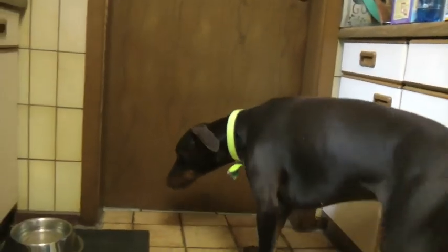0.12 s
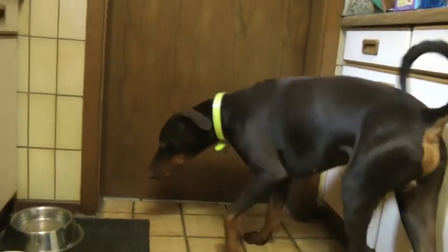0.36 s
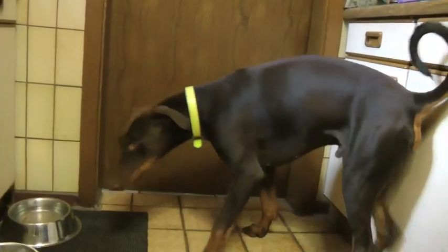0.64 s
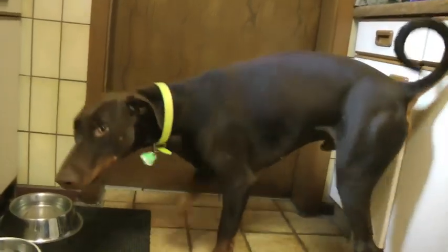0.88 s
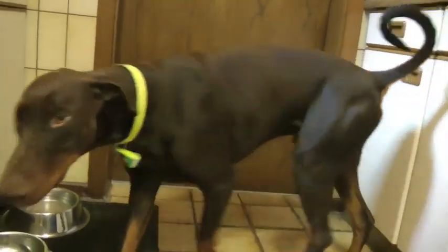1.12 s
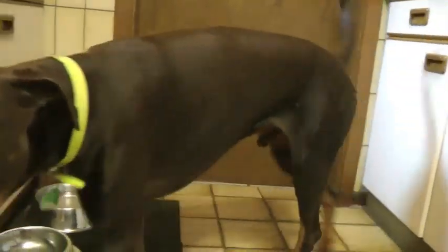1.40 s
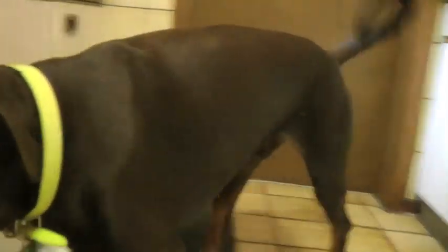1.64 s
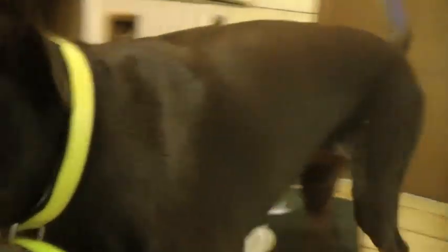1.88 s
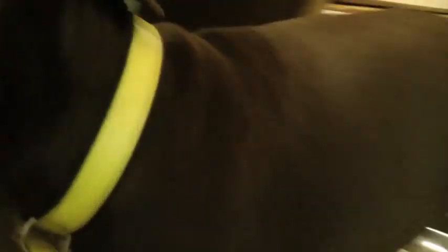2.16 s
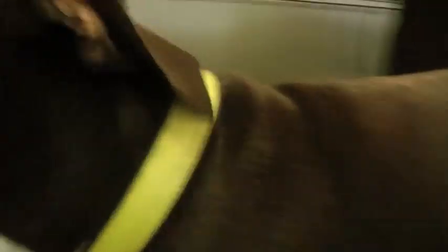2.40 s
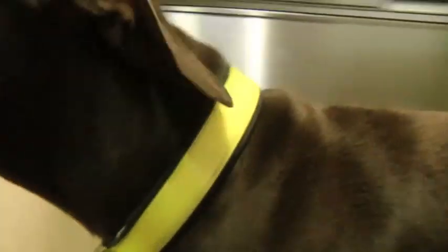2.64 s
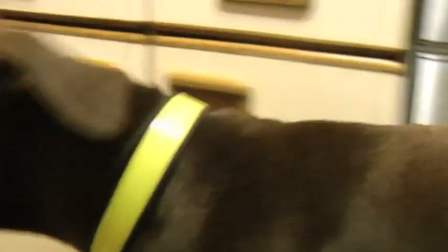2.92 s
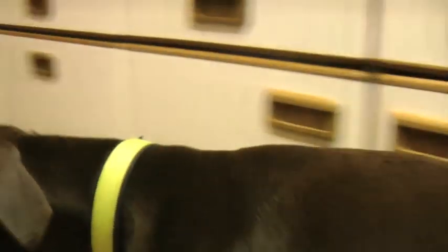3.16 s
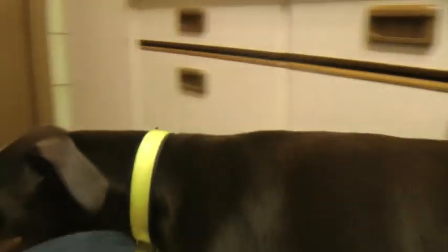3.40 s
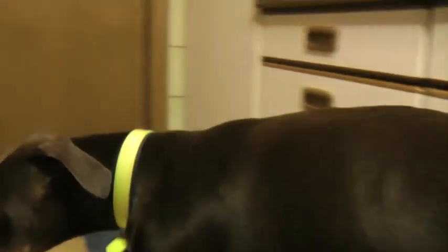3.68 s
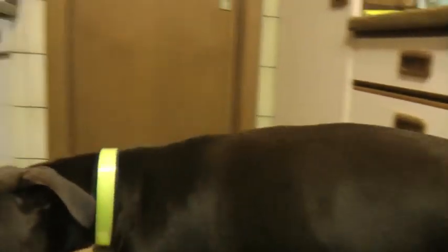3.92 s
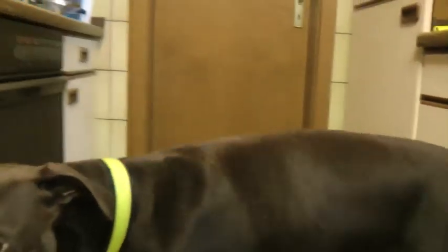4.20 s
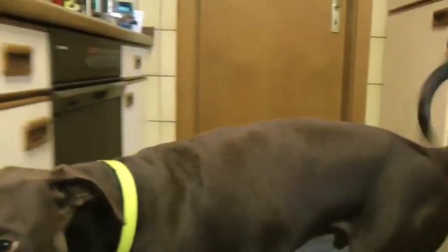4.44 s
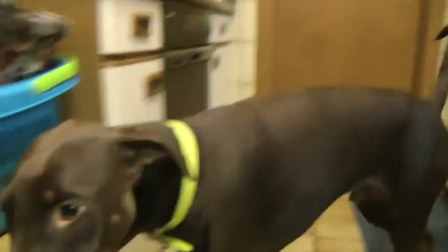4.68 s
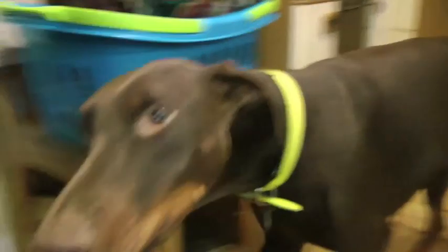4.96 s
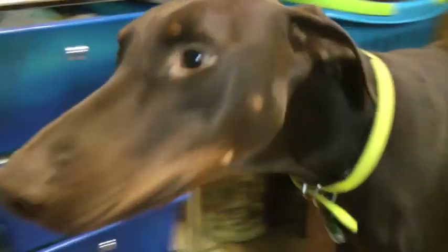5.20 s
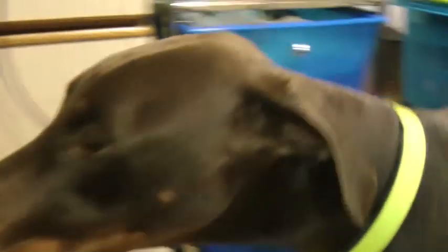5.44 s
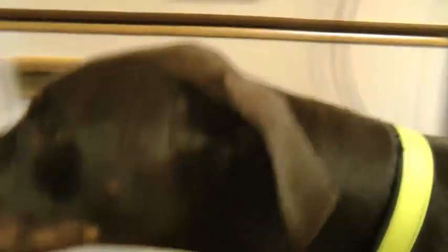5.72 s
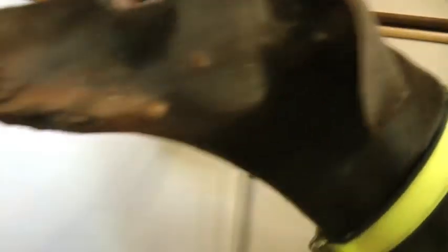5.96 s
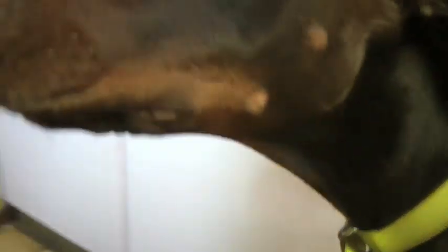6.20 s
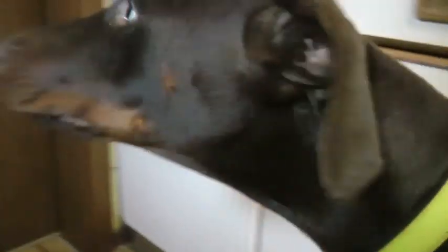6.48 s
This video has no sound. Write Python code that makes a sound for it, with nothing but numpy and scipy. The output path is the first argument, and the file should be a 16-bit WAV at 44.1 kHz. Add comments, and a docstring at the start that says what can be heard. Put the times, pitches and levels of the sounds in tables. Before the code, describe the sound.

A large dog paces close to a hand-held microphone in a small tiled kitchen. Four short, falling whimpers come first, mixed with piercing nose whistles and breaths. A lull of rustling, paw thuds and claw ticks follows, then fainter whines and a long whistle. Collar tags jingle brightly before a last cluster of low, broken whimpers. Short room echo and light handling rumble.

```python
"""In a small tiled kitchen, a large dog whimpers while pacing close to a hand-held camera.
Each whimper is a stack of overtones on a gliding pitch; high nose whistles are fluttering, fuzzy tones.
Breaths are noise through nostril resonances. Collar tags ring in dying noise bands, claws tick on tile,
and paws land with soft thuds. A wide rustle, low rumble and short room echo lie behind the dog."""
import sys
import numpy as np
from scipy import signal
from scipy.io import wavfile
from scipy.ndimage import uniform_filter1d

SR = 44100
rng = np.random.default_rng(int(sys.argv[2]) if len(sys.argv) > 2 else 0)


def waveform_to_disk(signal):
    """Save audio, clipped to [-1, 1], as 16-bit WAV at the path in sys.argv[1]."""
    frames = np.transpose(np.atleast_2d(signal))
    scaled = np.clip(frames, -1, 1) * 32767
    samples = np.round(scaled).astype(np.int16)
    wavfile.write(sys.argv[1], SR, samples)


def gain_from_decibels(decibels):
    """Convert decibel values to linear amplitude factors."""
    exponent = np.asarray(decibels, float) / 20
    return 10 ** exponent


N = 290619  # length in samples

# Rustle of coat, paws and panting, level before an overall trim: time_s, level_db
RUSTLE_LEVELS = [(0.0, -34.5), (.3, -35), (.59, -42.5), (.95, -39.5), (1.15, -42.5), (1.3, -40),
                 (1.7, -43.5), (1.91, -34), (2.21, -40), (2.449, -25.5), (2.66, -38.5), (2.88, -33),
                 (3.0, -36), (3.45, -35), (4.02, -38), (4.53, -33), (4.9, -35), (5.07, -28), (5.3, -32),
                 (5.61, -44), (5.9, -35), (6.28, -33.5), (6.59, -38.5)]
# Colour of the rustle, before its brightness drifts: frequency_hz, relative_level_db
RUSTLE_COLOUR = [(41, -27), (70, -3), (255, 0), (392, -0.5), (774, 1), (971, 1), (1300, 4), (1790, 1),
                 (6530, -7.5), (8570, -12), (14400, -21.5), (15800, -21)]
# How alike left and right are in the rustle: frequency_hz, likeness (1 = the same)
LEFT_RIGHT_LIKENESS = [(60, 0.12), (130, 1), (290, 0.54), (640, 0.82), (1410, 0.71), (3100, 0.9),
                       (6820, 0.94), (15000, 1)]
# Shifts of the hand on the camera, heard as low rumble: time_s, level_db
HAND_SHIFTS = [(.08, -61), (.4, -53), (.9, -58), (1.271, -46), (1.67, -44.5), (2.44, -59), (4.09, -53),
               (4.61, -49), (5.27, -54), (6.18, -68)]
SHIFT_RISE_DB_PER_S, SHIFT_FALL_DB_PER_S, STILL_HAND_DB = 161.5, 88, -102
# How long the kitchen echo takes to fall by 60 dB: frequency_hz, decay_s
ECHO_DECAY = [(300, 0.28), (1000, 0.34), (3000, 0.53), (8000, 0.062)]
# Paws landing: time_s, level_db, pitch_hz
PAW_STEPS = [(1.414, -38.5, 223.6), (2.421, -24, 235), (2.915, -25, 246), (3.144, -27, 149),
             (3.499, -25.5, 330), (4.088, -37.5, 86), (4.348, -26.5, 156), (4.76, -33.5, 320),
             (5.913, -29.5, 350)]
# Claws on tile: time_s, peak_db, centre_hz, left_over_right_db
CLAW_TICKS = [(0.215, -19, 3600, 1), (2.058, -16, 2660, 0), (2.2432, -23.5, 2460, 0),
              (2.28, -27, 3120, 0.0), (2.348, -19, 5200, 2.5), (2.8489, -24.5, 5950, 0),
              (3.0967, -27, 6400, 2), (3.4616, -21, 1610, -3), (3.5892, -12, 4470, 0.5),
              (4.2504, -18.5, 2940, -2), (5.79, -23, 2090, 1), (4.4651, -12.5, 4870, -2)]
# Collar tags knocking: time_s, level_db, low_ring_db, top_ring_db
TAG_KNOCKS = [(0.3965, -28, -0.5, -4), (0.7427, -21, -22, -18), (1.5409, -29.5, -26, -18),
              (1.6477, -27.5, -24, -14), (2.7711, -21.5, -5, -11), (2.8744, -35, -4, -4),
              (2.9292, -35, -19, -5), (3.8631, -23, -31, -21), (4.0228, -25, -34, -12),
              (4.1194, -28, -32, -13), (4.2154, -32.5, -52, -12), (4.375, -25.5, -10, -11),
              (4.4538, -26, -9, -7), (4.6399, -22, -35, -32), (5.2096, -29, -28, -4),
              (5.4625, -12.5, -4.5, -2), (5.5523, -18, -14, -13), (5.619, -22.5, -17, -14),
              (5.6481, -26, -11, -8), (5.8007, -23, -7.5, -4), (5.9853, -19, -9, -11),
              (6.2173, -22, -6, -7), (6.328, -22.5, -11, -4), (6.5071, -25, -21, -12)]
# Ringing tones of the tags: frequency_hz, relative_level_db, fall_by_60_db_s, resonance_width_hz
TAG_MODES = [(5800, 3, 0.047, 1300), (6570, 5.5, 0.24, 144), (8160, -20.5, 0.63, 100),
             (9070, -3, 0.19, 1000), (9425, -3.5, 0.06, 290), (9580, -3.5, 0.49, 250),
             (9800, -42, 0.061, 92), (13100, -28, 0.058, 910), (13900, 2, 0.17, 380),
             (14600, -14, 0.23, 1600), (15240, 2.5, 0.23, 400)]
# Breaths through the nostrils: start_s, length_s, level_db, nostril_hz, swell_db_per_s
BREATHS = [(.62, .18, -30, 4740, -64), (1.27, 0.3, -28.5, 4860, -25), (1.62, 0.46, -36, 4280, 13),
           (3.8, .46, -30, 4350, 11), (4.38, 0.48, -31, 4600, -6), (4.95, 0.53, -28.5, 4420, -24),
           (5.9, 0.75, -30, 4410, -10)]
# Breath envelope, one row: attack_s, rise_db, release_s, fall_db, arch_db
BREATH_SHAPE = (0.1, 14.5, 0.15, 25, 4.3)
NOSTRIL_DIP_HZ = 178  # the nostrils flare and their resonance sinks in mid breath
# Lower strands that join some whistles: start_s, length_s, level_db, pitch_hz, end_pitch_hz
LOWER_STRANDS = [(1.27, .1, -34, 4485, 4950), (1.37, 0.087, -45, 4440, 4730),
                 (1.64, 0.086, -42.5, 4570, 4060), (1.72, .08, -46, 4070, 4010),
                 (1.84, 0.159, -27.5, 4340, 4250), (3.84, 0.12, -34, 4470, 3920),
                 (3.93, 0.14, -36, 3900, 3930), (4.02, .18, -34.5, 3933, 4420),
                 (4.97, 0.13, -30, 4000, 4850), (6.06, .2, -36, 4330, 4250)]
# Strand envelope, one row: attack_s, rise_db, release_s, fall_db, arch_db
STRAND_ENVELOPE = (0.032, 11, 0.031, 14, 1.7)
# Nose whistles: start_s, length_s, level_db, pitch_hz, end_pitch_hz
NOSE_WHISTLES = [(0.0, 0.064, -17, 5180, 5305), (.38, 0.052, -19, 5441, 5514),
                 (.87, 0.087, -21.5, 5474, 5430), (1.36, 0.13, -27.5, 4880, 5130),
                 (1.61, 0.13, -28.5, 5260, 4820), (1.79, 0.12, -26, 4870, 4830),
                 (1.85, 0.18, -22, 4876, 4920), (3.5, 0.15, -34.5, 5150, 5000),
                 (3.78, 0.034, -37, 5320, 5400), (3.83, 0.11, -27, 4810, 4826),
                 (4.35, 0.046, -30.5, 5209, 5380), (4.43, .25, -21, 5000, 4753),
                 (4.65, 0.072, -20, 5110, 5076), (4.905, .075, -27.5, 5330, 5300),
                 (5.06, 0.33, -16, 5242, 5107), (5.84, 0.077, -32, 5240, 5440),
                 (5.98, 0.15, -27, 5190, 5296), (6.09, 0.11, -21, 5360, 5300),
                 (6.24, 0.054, -17, 5130, 5200), (6.32, 0.039, -23, 5000, 4980),
                 (6.45, 0.096, -30, 4978, 5070)]
# Whistle envelope, one row: attack_s, rise_db, release_s, fall_db, arch_db
WHISTLE_ENVELOPE = (0.0083, 8.6, 0.045, 14, 10.4)
SCOOP_HZ, SCOOP_S = 214.3, 0.01184  # depth and time constant of a whistle's slide up into its pitch
# Whimpers, one list of points each: time_s, pitch_hz, level_db
WHIMPER_PATHS = [
    [(0, 992, -15.5), (.06, 956, -25.5), (.14, 924, -22), (.165, 841.5, -10), (.18, 585, -32),
     (.2, 510, -36)],
    [(.404, 894, -18.5), (.425, 941, -9.5), (.47, 1021, -19), (.5, 993, -15.5), (.525, 943.4, -15.5),
     (.62, 929, -16.5), (.65, 875, -13), (.668, 542, -28.5), (.69, 483, -19.5)],
    [(.903, 840, -14), (.95, 908.3, -13), (1.02, 874, -17), (1.05, 783.8, -13.5), (1.2, 755.3, -16.5),
     (1.24, 704, -15), (1.3, 646.4, -18.5), (1.335, 567.4, -16), (1.44, 518.8, -34)],
    [(1.654, 789, -25), (1.67, 834, -9.5), (1.71, 829, -11), (1.74, 749, -17), (1.825, 669, -15),
     (1.86, 572.3, -22), (1.92, 556, -25.5), (1.96, 593, -43)],
    [(3.86, 690, -42), (3.895, 708, -28), (3.912, 722, -15), (3.95, 714.5, -17), (3.99, 736, -23.5),
     (4.05, 740, -17), (4.09, 709.4, -23), (4.135, 696, -23.5), (4.165, 602, -36.5)],
    [(4.55, 815, -39), (4.585, 789, -25), (4.68, 739, -34), (4.71, 526, -51)],
    [(6.01, 385, -50), (6.04, 394, -44), (6.11, 453, -51), (6.14, 414, -52)],
    [(6.158, 475, -12.5), (6.172, 542, -17), (6.19, 490, -12), (6.215, 538, -14), (6.243, 504, -18.5),
     (6.262, 418, -21)],
    [(6.27, 508, -19), (6.3, 572, -15), (6.32, 531, -16), (6.334, 456, -19)],
    [(6.336, 520, -13), (6.35, 568, -15), (6.385, 604, -14), (6.425, 600, -16), (6.445, 535, -24.5),
     (6.465, 397, -30.5)],
]
# Brightness, one row a whimper: throat_overtones_db, nose_overtones_db
WHIMPER_BRIGHTNESS = [(-1, 9), (1.5, -2), (0.5, -13), (-4.5, -16), (-3, -22), (-7.5, -2), (-15, -15),
                      (-18.5, -12), (-13, -2), (-12.5, -22)]
# Gain of the overtones through throat and closed muzzle: frequency_hz, gain_db
MUZZLE_GAIN = [(900, -1), (1400, -12.5), (1900, -9), (2400, -21), (3000, -28.5), (3900, -12.5),
               (4700, -18.5), (5600, -14), (7000, -39), (9500, -30.5), (13000, -55)]
USUAL_DB, FOLLOW = -13, 0.73  # overtones follow only a share of the swings around the usual level
THROAT_DB_PER_S, NOSE_DB_PER_S = -18.5, 8  # the throat closes and the nose takes over during a whimper
NOSE_OPENS_S, NOSE_SHUT_DB = 0.045, -15  # nose overtones come in after the onset
# Overtones thin out while the pitch falls faster than a limit
BREAK_DB_PER_OCTAVE_S, BREAK_FROM_OCTAVES_S = -3, 3.5
# Where the dog is: time_s, left_over_right_db
DOG_SIDE = [(0.0, -1.5), (0.84, 0.5), (1.21, 0), (1.63, 4), (3.72, -1), (3.84, -3.5), (4.42, 3.5),
            (5.69, 0.5), (6.59, 5.5)]
KNEE_DB, SQUEEZE, RECOVER_DB_PER_S = -16.5, 0.26, 45  # gain control; SQUEEZE is dB of cut per dB over


def evened(x):
    """Scales to an average strength (rms) of 1."""
    return x / np.sqrt(np.mean(x ** 2) + 1e-20)


def read(points, hz):
    """Reads a curve between its points on a log-frequency axis."""
    point_hz, value = np.transpose(points)
    return np.interp(np.log(hz + 1), np.log(point_hz + 1), value)


def add(mix, s, sound, side_db=0):
    """Places a sound in the stereo mix, louder on the left when side_db is positive."""
    part = mix[:, round(s * SR):][:, :len(sound)]
    part += sound[:part.shape[1]] * gain_from_decibels(np.array([[side_db / 2], [-side_db / 2]]))


def waver(n, width):
    """A smooth random curve of rms 1; width in points sets how slowly it moves."""
    once = uniform_filter1d(rng.standard_normal(n), round(width))
    return evened(uniform_filter1d(once, round(width)))


def resonate(x, hz, width):
    """A resonance that can move: shifts the curve hz down to zero, smooths, and shifts back."""
    turn = np.exp(2j * np.pi * np.cumsum(hz * np.ones(len(x))) / SR)
    r = np.exp(-np.pi * width / SR)
    return 2 * (turn * signal.lfilter([1 - r], [1, -r], x / turn)).real


def steep(x, hz, width):
    """A resonance applied twice, scaled to rms 1."""
    return evened(resonate(resonate(x, hz, width), hz, width))


def played(rows, edge_s):
    """Turns a table into smooth columns with soft ends; a sound from time zero has no fade-in."""
    s, *columns = np.transpose(rows)
    t = np.arange(s[0], s[-1], 1 / SR)
    since_start = t - s[0] + (s[0] < .01)
    edge = np.clip(np.minimum(since_start, s[-1] - t) / edge_s, 0, 1)
    return [np.interp(t, s, c) for c in columns] + [edge]


def shaped(length, attack_s, rise_db, release_s, fall_db, arch_db):
    """Time, and a level in dB that rises, arches gently and falls; short sounds squeeze both ends."""
    t = np.arange(0, length, 1 / SR)
    rise = np.clip(1 - t / min(attack_s, 0.25 * length), 0, 1)
    fall = np.clip(1 - (length - t) / min(release_s, .65 * length), 0, 1)
    arch = (2 * t / length - 1) ** 2
    return t, -rise_db * rise - fall_db * fall - arch_db * arch


def rumble():
    """Unrelated low noise at each microphone; it swells with every shift of the hand."""
    band = signal.butter(2, [22, 75], "bandpass", fs=SR, output="sos")
    low = signal.sosfilt(band, rng.standard_normal((2, N)))
    t = np.arange(N) / SR
    swells = 0
    for s, db in HAND_SHIFTS:
        drop_db = np.maximum(SHIFT_RISE_DB_PER_S * (s - t), SHIFT_FALL_DB_PER_S * (t - s))
        swells = swells + gain_from_decibels(db - drop_db)
    return (gain_from_decibels(STILL_HAND_DB) + swells) * evened(low)


def rustle():
    """Coat, paws and panting: random short-time spectra that swell, with drifting brightness."""
    frames, hz = N // 128 + 5, np.fft.rfftfreq(512, 1 / SR)
    a, b, c, d, patches = rng.standard_normal((frames, 257, 5)).T
    # patches that are louder or softer in time and frequency
    patches = evened(uniform_filter1d(uniform_filter1d(patches, 8, 0), 20, 1))
    patch_db = 3.5 * np.tanh(patches)
    grain_db = 1.73 * waver(frames, 2)  # hair and pads scuff in short grains
    db = np.interp(np.arange(frames) * 128 / SR, *np.transpose(RUSTLE_LEVELS))
    tilt_db = 1.44 + 1.48 * waver(frames, 90)  # brightness drifts, dB per octave
    # the right side shares part of the left side's noise
    same = np.clip(read(LEFT_RIGHT_LIKENESS, hz), -1, 1)[:, None]
    left = a + 1j * b
    right = same * left + np.sqrt(1 - same ** 2) * (c + 1j * d)
    octaves = np.log2(np.maximum(hz, 300) / 2000)[:, None]
    colour_db = read(RUSTLE_COLOUR, hz)[:, None]
    z = np.array([left, right]) * gain_from_decibels(colour_db + patch_db + grain_db + db + tilt_db * octaves)
    return gain_from_decibels(-19.5) * signal.istft(z, nperseg=512, noverlap=384)[1][:, :N]


def kitchen(x):
    """Room echo: sparse taps of random sign, each band dying at its own speed."""
    taps = np.zeros((2, SR // 2))
    # one tap in every 20 samples, at a random place
    at = np.arange(200, SR // 2 - 20, 20) + rng.integers(0, 20, (2, (SR // 2 - 201) // 20))
    np.put_along_axis(taps, at, rng.choice([-1., 1.], at.shape), 1)
    hz, t, z = signal.stft(taps, SR, nperseg=256)
    decay = gain_from_decibels(-60 * t / read(ECHO_DECAY, hz)[:, None])
    tail = signal.istft(z * decay, SR, nperseg=256)[1]
    # the two microphones sit close together
    tail[1] = .55 * tail[0] + .835 * tail[1]
    return signal.fftconvolve(x[None], tail / np.linalg.norm(tail[0]), axes=1)[:, :N]


def paw_step(db, hz):
    """A soft pad thud: a dull burst around the floor's low ring."""
    t = np.arange(SR // 4) / SR
    burst = evened(resonate(rng.standard_normal(len(t)), hz, 215))
    thud = np.sin(2 * np.pi * hz * t) + .5 * burst
    return gain_from_decibels(db - 60 * t / 0.059) * (1 - np.exp(-t / 0.0042)) * thud


def claw(db, hz):
    """A dry tick with a short scrape after it, coloured by nail and tile."""
    t = np.arange(SR // 6) / SR
    tick, scrape = gain_from_decibels(-60 * t / .008), gain_from_decibels(-8 - 60 * t / .2)
    burst = rng.standard_normal(len(t)) * (tick + scrape)
    sound = 0.022 * resonate(burst, 2700, 7100) + resonate(burst, hz, 2000)
    return gain_from_decibels(db) * sound / abs(sound).max()


def jingle(db, low_db, top_db, spread):
    """The tags knock and go on rattling: a dying noisy chatter of touches drives each mode."""
    t = np.arange(SR // 2) / SR
    chatter = rng.standard_normal(len(t)) * gain_from_decibels(1.8 * waver(len(t), 56))
    tick = gain_from_decibels(-36 - 60 * t / 0.0037) * np.diff(rng.standard_normal(len(t) + 1), 2, prepend=0)
    ring = 0
    for (hz, mode_db, t60, width), chance in zip(TAG_MODES, spread):
        extra_db = low_db if hz < 7000 else top_db if hz > 12000 else 0
        fading = gain_from_decibels(mode_db + 2 * chance + extra_db - 60 * t / t60)
        ring = ring + fading * steep(chatter, hz, width)
    return gain_from_decibels(db - 7.5) * (ring + tick)


def puff(length, level_db, nostril_hz, swell_db_per_s):
    """Turbulent air through the nostrils: a moving main resonance, one above it and faint air on top."""
    t, db = shaped(length, *BREATH_SHAPE)
    hz = nostril_hz - NOSTRIL_DIP_HZ * np.sin(np.pi * t / length)
    edge = np.clip(np.minimum(t, length - t) / 0.024, 0, 1)
    air = rng.standard_normal(len(hz)) * gain_from_decibels(0.92 * waver(len(hz), 150))
    main = steep(air, hz * (1 + 0.048 * waver(len(hz), 820)), 740)
    upper = steep(steep(air, 5500, 1500), 5500, 1500)
    top = steep(air, 9300, 2500)
    highest = steep(air, 12800, 3000)
    breath = main + gain_from_decibels(-13.5) * upper + gain_from_decibels(-14.0) * top + gain_from_decibels(-21) * highest
    return gain_from_decibels(level_db + db + swell_db_per_s * (t - length / 2)) * edge * breath


def whistle(length, level_db, pitch_hz, end_hz, shape=WHISTLE_ENVELOPE, scoop_hz=SCOOP_HZ,
            fuzz_db=-12, flutter_db=3.5):
    """A nose whistle: a fluttering near-sine with a faint octave and a fuzzy skirt of noise."""
    t, db = shaped(length, *shape)
    hz = pitch_hz + (end_hz - pitch_hz) * t / length - scoop_hz * np.exp(-t / SCOOP_S)
    edge = np.clip(np.minimum(t, length - t) / 0.0025, 0, 1)
    turns = np.cumsum(hz * (1 + 0.0047 * waver(len(hz), 230))) / SR
    tone = np.cos(2 * np.pi * turns) + gain_from_decibels(-24) * np.cos(4 * np.pi * turns)
    fuzz = steep(rng.standard_normal(len(hz)), hz, 340)
    loudness = gain_from_decibels(level_db + db + flutter_db * waver(len(hz), 250)) * edge
    return loudness * (np.sqrt(2) * tone + gain_from_decibels(fuzz_db) * fuzz)


def strand(*row):
    """The lower strand is a rougher, broken whistle that glides without a scoop."""
    return whistle(*row, shape=STRAND_ENVELOPE, scoop_hz=0, fuzz_db=-8, flutter_db=4)


def whimper(rows, throat_db, nose_db):
    """Nearly steady vocal folds; the higher overtones flicker and blur in the breath."""
    hz, db, edge = played(rows, 0.0089)
    t = np.arange(len(hz)) / SR
    held_db = (1 - FOLLOW) * (USUAL_DB - db)
    throat_db = throat_db + THROAT_DB_PER_S * t
    # a whimper from time zero starts with the nose already open
    shut_db = NOSE_SHUT_DB * (rows[0][0] > 0) * np.exp(-t / NOSE_OPENS_S)
    nose_db = nose_db + NOSE_DB_PER_S * t + shut_db
    falling = -np.gradient(np.log2(hz)) * SR  # octaves per second
    too_fast = np.maximum(falling - BREAK_FROM_OCTAVES_S, 0)
    held_db = held_db + BREAK_DB_PER_OCTAVE_S * uniform_filter1d(too_fast, 400)
    turns = np.cumsum(hz * (1 + 0.0026 * waver(len(hz), 280))) / SR
    stack = np.cos(2 * np.pi * turns)
    for k in range(2, 15):
        nose = np.clip((k * hz - 2600) / 800, 0, 1)  # share of the upper resonances
        flicker_db = (1.5 + 2.5 * nose) * waver(len(hz), 500)
        colour_db = throat_db * (1 - nose) + nose_db * nose
        gain_db = read(MUZZLE_GAIN, k * hz) + held_db + colour_db + flicker_db
        blur = (.05 + .2 * nose) * waver(len(hz), 40)  # phase scatter in radians
        stack += gain_from_decibels(gain_db) * np.cos(2 * np.pi * k * turns + blur + k * k)
    return np.sqrt(2) * gain_from_decibels(db + 1.13 * waver(len(hz), 384)) * edge * stack


def scene():
    """Dog, tags, claws and paws, their echo in the kitchen, the rustle and the rumble."""
    dog, small = np.zeros((2, 2, N))
    for rows, bright in zip(WHIMPER_PATHS, WHIMPER_BRIGHTNESS):
        add(dog, rows[0][0], whimper(rows, *bright))
    for table, sound in (NOSE_WHISTLES, whistle), (LOWER_STRANDS, strand), (BREATHS, puff):
        for s, *row in table:
            add(dog, s, sound(*row))
    # every knock rings the tag modes in a different balance
    spread = rng.standard_normal((len(TAG_KNOCKS), len(TAG_MODES)))
    for (s, db, low_db, top_db), chance in zip(TAG_KNOCKS, spread):
        add(small, s, jingle(db, low_db, top_db, chance))
    for s, db, hz, side_db in CLAW_TICKS:
        add(small, s, claw(db, hz), side_db)
    for s, db, hz in PAW_STEPS:
        add(small, s, paw_step(db, hz))
    side_db = np.interp(np.arange(N) / SR, *np.transpose(DOG_SIDE))
    echo = kitchen(gain_from_decibels(-7.5) * dog[0] + gain_from_decibels(-6.0) * small.mean(0))
    placed_dog = dog * gain_from_decibels(np.outer([.5, -.5], side_db))
    return placed_dog + small + echo + rustle() + rumble()


def top_cut(x):
    """Nothing passes above the cut-off."""
    return signal.sosfilt(signal.butter(12, 16470, fs=SR, output="sos"), x)


def record(dry):
    """Gain control holds loud moments down and recovers slowly; then the top treble is cut off."""
    power_db = 10 * np.log10(abs(uniform_filter1d((dry ** 2).mean(0), 300)) + 1e-12)
    # hold each peak and let it sink at a steady rate
    fall = np.arange(N) * RECOVER_DB_PER_S / SR
    peak_db = np.maximum.accumulate(power_db + fall) - fall
    over_db = np.maximum(peak_db - KNEE_DB, 0)
    held = dry * gain_from_decibels(-SQUEEZE * uniform_filter1d(over_db, 200))
    low_pass = signal.firwin(255, 15900, window=("kaiser", 8), fs=SR)
    mix = signal.oaconvolve(held, low_pass[None], "same")
    return top_cut(mix)


dry = scene()
out = record(dry)
waveform_to_disk(out)
```